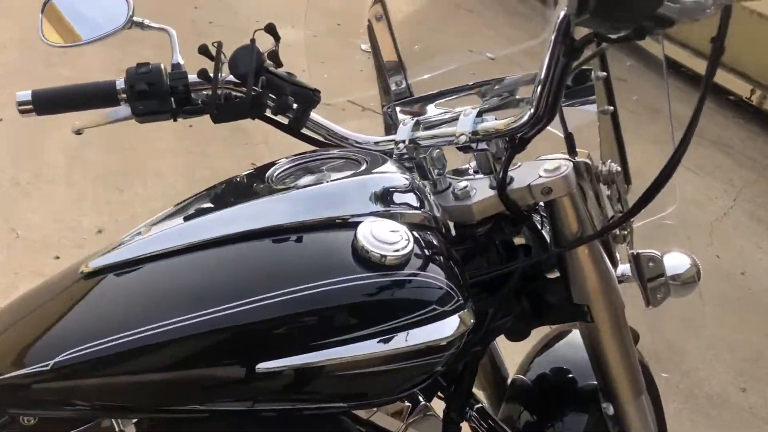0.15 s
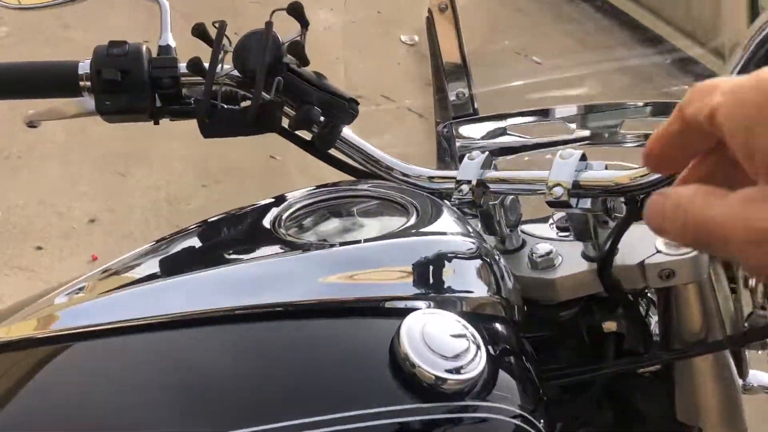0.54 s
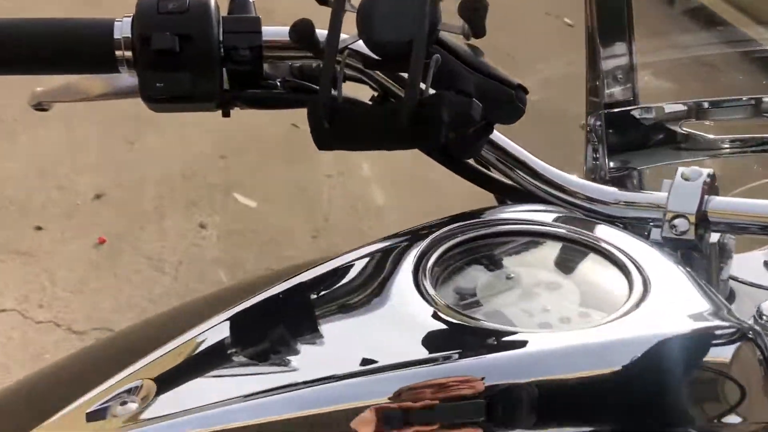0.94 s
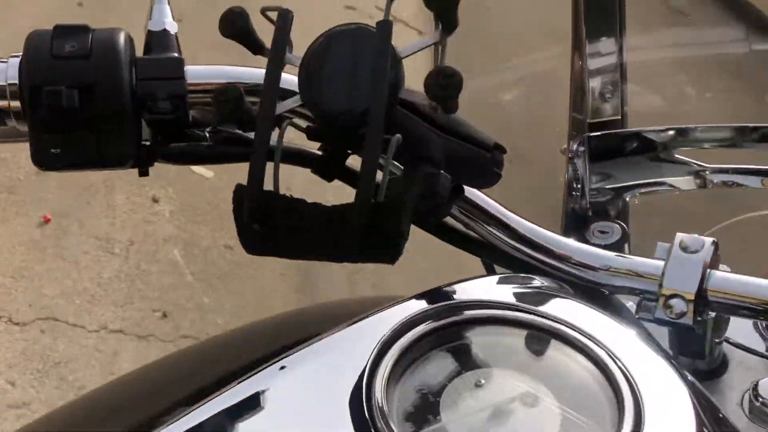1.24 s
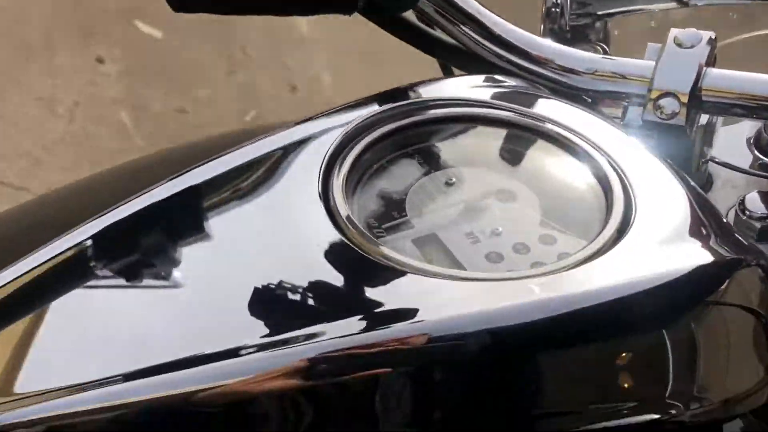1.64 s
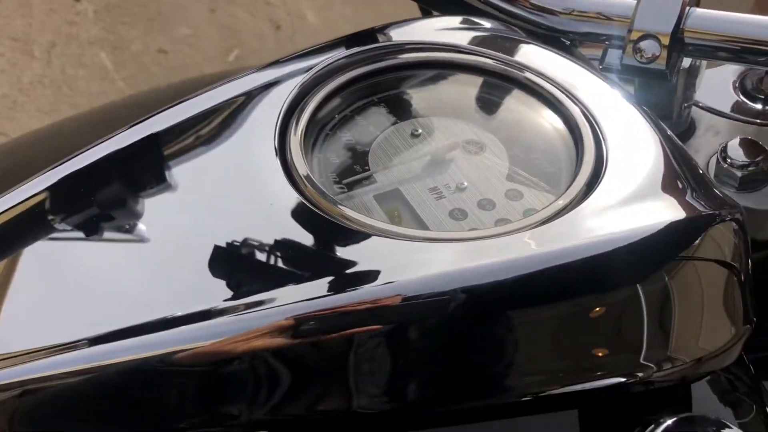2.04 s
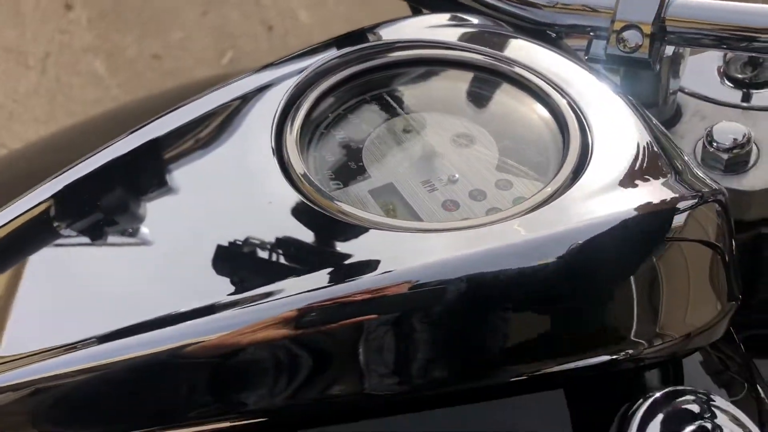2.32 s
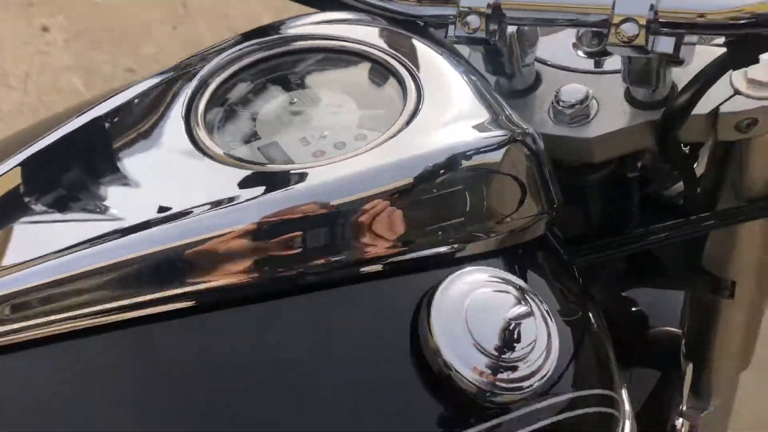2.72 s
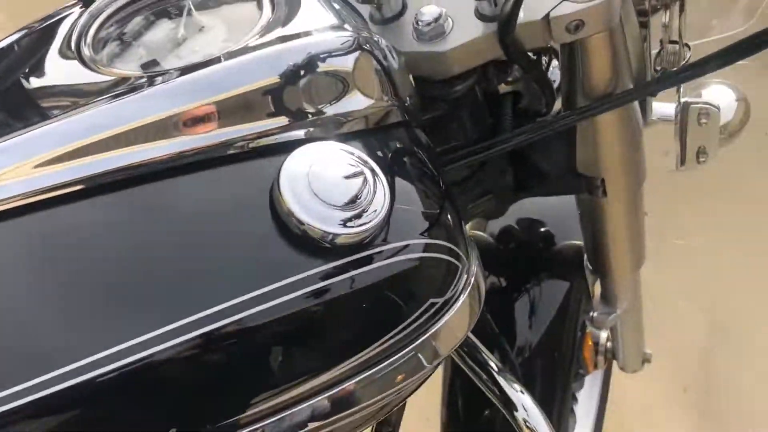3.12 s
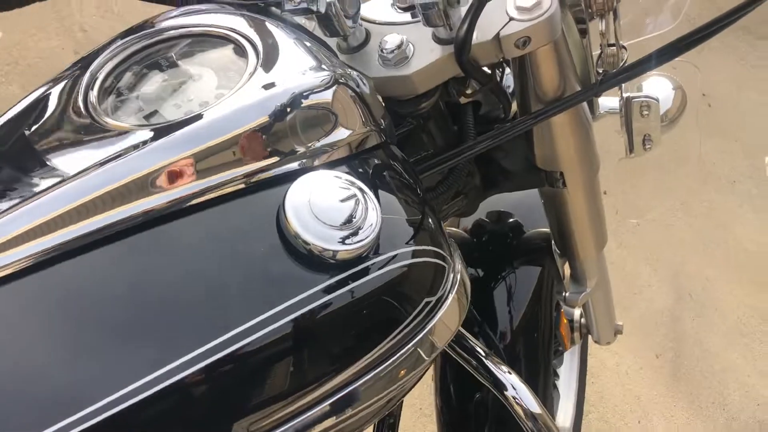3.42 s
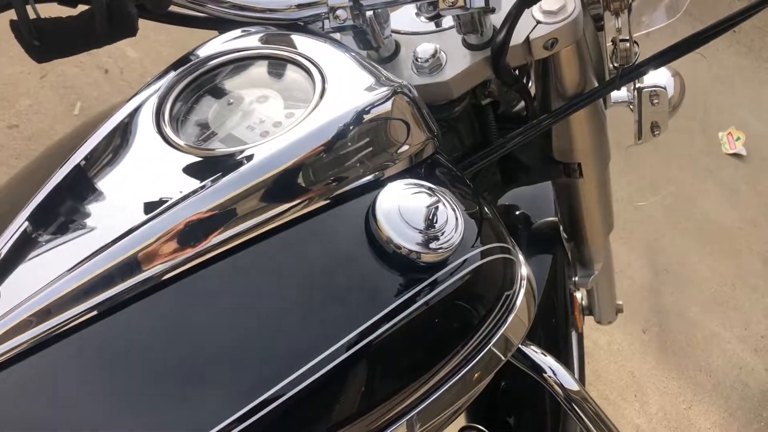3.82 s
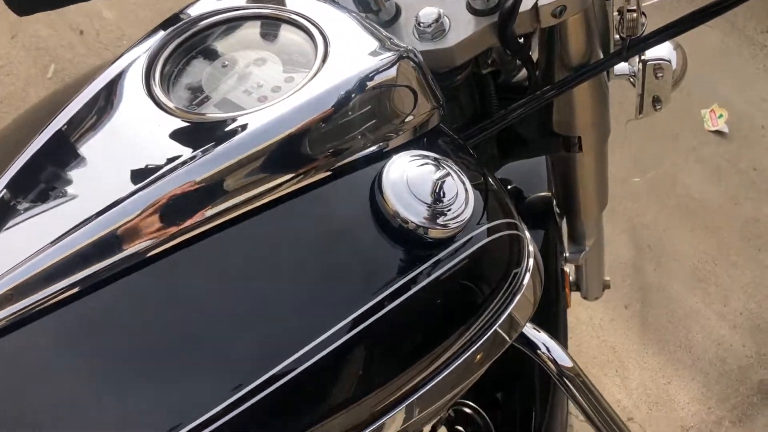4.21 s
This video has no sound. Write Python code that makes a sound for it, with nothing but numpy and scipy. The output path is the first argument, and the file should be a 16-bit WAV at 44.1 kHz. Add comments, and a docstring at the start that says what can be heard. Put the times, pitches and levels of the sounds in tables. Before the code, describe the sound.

Outdoors, close to a parked motorcycle, clothes rustle faintly and shoes scuff over a low rumble of distant traffic. A switch snaps with a sharp click. A relay ticks, and the electric fuel pump jolts and spins up into a steady high whine with a fine hiss. It keeps running to the end, with a few brief scuffs and knocks from the rider over it.

```python
"""Far traffic rumbles round a yard where a motorcycle stands. A rider shuffles close, cloth and shoes
making friction noise, and snaps the switch, whose contacts ring its modes. A relay ticks shut and the
fuel pump spins up, jolting as it first takes fuel. It runs on with a twelve-per-turn whine, weaker lines
at other multiples of the shaft speed, brush hiss that partly repeats every turn, and a housing that
resonates with the flow. Near the end the rider scuffs and knocks again."""
import sys
import numpy as np
from scipy import signal
from scipy.fft import rfft, irfft, next_fast_len
from scipy.io import wavfile
from scipy.ndimage import map_coordinates

SR = 44100
rng = np.random.default_rng(int(sys.argv[2]) if len(sys.argv) > 2 else 0)


def bounce(signal):
    """Save signal as a 16-bit WAV file at the path given by the first command-line argument."""
    frames = np.transpose(np.atleast_2d(signal))
    limited = np.clip(frames, -1, 1)
    pcm = np.round(limited * 32767).astype(np.int16)
    wavfile.write(sys.argv[1], SR, pcm)


N = 192364
TIME = np.arange(N) / SR
START_S = 1.8825   # the relay closes
RUNNING_S = np.clip(TIME - START_S, 0, None)


def pump():
    """Rotating machine: tones and brush hiss lock to one shaft angle; the other noises run free."""
    turns = shaft_turns()
    settled = np.clip((TIME - 1.96) / 0.06, 0, 1)   # fine lines form only once the speed steadies
    locked = whine(turns) + settled * shaft_lines(turns) + brushes(turns, settled)
    return locked + housing() + gulps() + sputter()


def shaft_turns():
    """Angle is the integral of speed: a quick kick, a slower creep, a sag as fuel pressure builds."""
    top_hz, sag_hz_per_s = 95.83, .47
    kick_hz, kick_s, creep_hz, creep_s = 59, .046, 11.7, .07
    missing_hz = kick_hz * np.exp(-(RUNNING_S / kick_s) ** 1.5) + creep_hz * np.exp(-RUNNING_S / creep_s)
    wobble_turns = 0.00095 * drift(8.2)
    return np.cumsum(top_hz - sag_hz_per_s * RUNNING_S - missing_hz) / SR + wobble_turns


def whine(turns, order=12):
    """Periodic forcing: a tone and its octave, which swell and dip as the listener moves round the tank."""
    # Level contour of the two tones: time_s, whine_db, octave_db
    contour = [(1.89, -58, -71), (1.94, -34, -58), (1.99, -38, -64), (2.05, -41.5, -61), (2.12, -43, -70),
               (2.18, -44, -63), (2.3, -45, -64), (2.61, -41, -72), (2.71, -43, -73), (2.8, -44.5, -62),
               (2.94, -47, -61.5), (3.09, -44.5, -60), (3.28, -46, -60.5), (3.46, -42, -55),
               (3.71, -46.5, -57.5), (4.25, -42, -58.5), (4.36, -42.5, -59)]
    whine_db, octave_db = in_time(contour, left=-120)
    phase = 2 * np.pi * order * turns
    tones = from_db(whine_db) * np.sin(phase) + from_db(octave_db) * np.sin(2 * phase)
    up_to_speed = np.clip((TIME - 1.93) / 0.12, 0, 1)
    return np.sqrt(2 * up_to_speed) * tones


def shaft_lines(turns):
    """Harmonics of the rotation: each flickers and is heard best at one moment of the listener's move."""
    # Shaft harmonics: cycles_per_turn, level_db, best_time_s
    lines = [(9, -60, 2.4), (11, -64, 2.8), (16, -65, 2.3), (18, -71, 2.3), (21, -72, 2.7), (36, -74, 2.4),
             (42, -73, 4.0), (43, -73, 2.2), (48, -69, 4.25), (54, -73, 3.3), (66, -72, 3.7),
             (72, -75, 2.6), (83, -62, 2.25), (87, -62, 2.7), (88, -65, 2.9), (90, -67, 4.0),
             (93, -67, 2.5), (95, -68, 4.1), (99, -66, 4.0), (107, -66, 3.8), (111, -64, 2.8),
             (115, -62, 2.95), (117, -62, 2.35), (119, -62, 3.1), (123, -63, 2.4), (131, -66, 2.6),
             (135, -65, 2.25), (147, -62, 2.6), (148, -64, 2.65), (149, -61, 2.5), (151, -61, 2.9),
             (152, -59, 3.2), (153, -59, 3.9), (155, -60, 2.3), (159, -59, 2.5), (160, -59, 2.5),
             (161, -61, 2.3), (163, -59, 2.5), (164, -58, 2.45)]
    # A bright band sliding over the highest lines: time_s, centre_hz
    bright_band = [(2.3, 15650), (2.65, 15550), (2.9, 14900), (3.1, 14300), (3.4, 14100), (4.36, 14800)]
    bright_db, bright_width_hz = 4.5, 140
    fall_db_per_s, depth_db, flicker_db = 11, 7.5, 2.5
    bright_hz = in_time(bright_band)[0]
    shaft_hz = np.gradient(turns) * SR
    out = np.zeros(N)
    for order, db, best_s in lines:
        lift_db = bright_db * np.exp(-((order * shaft_hz - bright_hz) / bright_width_hz) ** 2)
        away_db = np.minimum(fall_db_per_s * np.abs(TIME - best_s), depth_db)
        level = from_db(db - away_db + lift_db + flicker_db * drift(3.2))
        out += level * np.sin(2 * np.pi * order * turns + rng.uniform(0, 2 * np.pi))
    return np.sqrt(2) * out


def brushes(turns, settled):
    """Sliding friction: the brushes meet the same roughness every turn, wandering over several tracks."""
    # Spectrum of the hiss: frequency_hz, relative_density_db
    spectrum = [(1530, -52), (2600, -50), (3140, -36), (3830, -49), (4130, -8), (4290, -21), (4920, -18),
                (5230, -12.5), (6570, -18.5), (8200, -8), (9610, -9), (10900, -5.5), (13200, -6.5),
                (15100, 1), (16000, -4.5)]
    spots, repeat_share = 464, 0.69
    level_db, rise_s, surge_db, surge_s, fade_db_per_s = -47.5, 0.1, 4.5, 0.31, 1.5
    tracks = rng.standard_normal((6, spots))
    spot = (turns % 1) * spots
    weights = np.array([drift(2.5) for _ in tracks])
    weights /= np.linalg.norm(weights, axis=0)
    roughness = sum(weight * np.interp(spot, np.arange(spots), track, period=spots)
                    for weight, track in zip(weights, tracks))
    periodic = rms_one(signal.lfilter([1, -.5], [1], roughness))   # tilted towards the treble
    share = repeat_share * settled
    scrape = np.sqrt(share) * periodic + np.sqrt(1 - share) * rng.standard_normal(N)
    hiss_db = level_db + surge_db * np.exp(-RUNNING_S / surge_s) - fade_db_per_s * RUNNING_S
    onset = np.clip(RUNNING_S / rise_s, 0, 1) ** .5
    return onset * from_db(hiss_db) * coloured(ground_echo(scrape), spectrum)


def ground_echo(x, delay_s=.0007, wander_s=.00005, gain=.3):
    """Comb filtering: a ground reflection interferes with the hiss, shifting as the listener moves."""
    emitted_s = TIME - delay_s - wander_s * drift(0.45)
    return rms_one(x + gain * map_coordinates(x, [emitted_s * SR], order=3))


def housing(level_db=-50, fade_db_per_s=2, waver_db=1):
    """Forced resonance: the fuel flow shakes the housing, whose modes drone."""
    # Housing modes: frequency_hz, width_hz, relative_db
    modes = [(646, 8, 5.5), (787, 17, 1.5), (862, 21, 1), (1025, 86, 3.5), (1590, 68, -31),
             (2030, 200, -39)]
    flow = rng.standard_normal(N)
    drone = sum(from_db(db) * rms_one(resonance(flow, hz, width)) for hz, width, db in modes)
    drone_db = level_db - fade_db_per_s * RUNNING_S + waver_db * drift(9.0)
    return (RUNNING_S > 0) * from_db(drone_db) * rms_one(drone)


def gulps():
    """Damped transients: the pump jolts as it first takes fuel."""
    # Jolts: start_s, unfiltered_db, t60_s, centre_hz
    jolts = [(1.884, -31, 0.64, 1070), (1.901, -35.5, 0.57, 1630), (1.922, -18, 0.04, 816),
             (1.946, -15.5, 0.095, 830)]
    return sum(around(burst(s, db, rise_s=0.0052, t60_s=t60), hz, octaves=0.53) for s, db, t60, hz in jolts)


def sputter():
    """Narrow-band noise: a hiss swells briefly."""
    return around(burst(2.15, -42.5, rise_s=0.12, t60_s=0.26), hz=5700, octaves=.25)


def whistles(ramp_s=.003):
    """Gated pure tones: three thin, brief whistles just after the pump starts."""
    # Whistles: start_s, length_s, pitch_hz, level_db
    tones = [(2.17, .02, 13700, -50), (2.18, 0.048, 11750, -48), (2.243, 0.023, 8450, -47.5)]
    out = np.zeros(N)
    for s, length, hz, db in tones:
        gate = np.clip(np.minimum(TIME - s, s + length - TIME) / ramp_s, 0, 1)
        out += from_db(db) * gate * np.sin(2 * np.pi * hz * TIME)
    return out


def switch():
    """Impact excites modes: the contacts ring the switch, with a crack, a rattle and the yard's tail."""
    # Contact impacts: start_s, level_db
    snaps = [(1.7272, -29), (1.7291, -30.5), (1.7300, -21.5), (1.7315, -33), (1.736, -33), (1.742, -37)]
    # Switch modes: frequency_hz, gain_db, t60_s
    modes = [(860, -20, 0.14), (1044, -14, 0.079), (1480, -12, 0.016), (1980, -14, 0.035),
             (2375, 2.5, 0.011), (3940, -11.5, 0.023), (5160, -4.5, 0.029), (5920, -6.5, 0.019),
             (6790, -2, 0.02), (7370, -24, .025), (9090, -3.5, 0.014), (10600, -17, 0.017),
             (13700, -13, 0.017)]
    snap_s, snap_db = np.transpose(snaps)
    at = np.round(snap_s * SR).astype(int)
    signs = (-1) ** np.arange(1, len(at) + 1)
    ring = np.zeros(N)
    for hz, gain_db, t60 in modes:
        impulses = np.zeros(N)
        impulses[at] = signs * from_db(snap_db + gain_db + rng.normal(0, 0.6, len(at)))
        r, w = from_db(-60 / (t60 * SR)), 2 * np.pi * hz / SR   # pole radius and angle
        ring += signal.lfilter([0, np.sin(w)], [1, -2 * r * np.cos(w), r * r], impulses + 1e-18)
    ring = band(ring, low_hz=750, high_hz=19200)   # too small to thud
    rattle = around(burst(1.734, -43.5, rise_s=.004, t60_s=0.45), hz=5300, octaves=0.17)
    crack = band(burst(1.728, -17, rise_s=0.0022, t60_s=0.021), low_hz=3640, high_hz=17600)
    tail = band(burst(1.732, -37, rise_s=0.0021, t60_s=0.23), low_hz=885, high_hz=7300)
    return ring + rattle + crack + tail


def relay():
    """A short impact has a wide spectrum: the relay closes with one bright tick."""
    return band(burst(START_S, -39, rise_s=0.00088, t60_s=0.035), low_hz=2800, high_hz=16000)


def rider():
    """Friction and impact: scuffs, knocks and ticks are short noise bursts with a gritty amplitude."""
    # Shoe and hand scuffs: start_s, unfiltered_db, rise_s, t60_s, low_hz
    scuffs = [(0.03, -42.5, .027, 0.17, 2000), (0.476, -46, .004, 0.15, 1190), (.72, -62, .008, .06, 3000),
              (.805, -64, 0.014, 0.17, 5000), (1.063, -48, 0.0027, 0.051, 1500),
              (1.44, -55, 0.0086, 0.17, 2500), (3.475, -35.5, 0.0068, 0.082, 890),
              (3.641, -42, 0.0027, .04, 2500), (3.662, -46.5, 0.0055, 0.24, 1990),
              (3.772, -46, 0.014, 0.17, 1500)]
    # Dull knocks: start_s, unfiltered_db, t60_s, centre_hz
    knocks = [(.478, -38, 0.12, 1800), (3.482, -26, 0.065, 880), (3.506, -38, 0.07, 2200),
              (3.648, -29, 0.034, 1400), (3.865, -41, 0.021, 2190)]
    # Ticks of key and cables: start_s, unfiltered_db, t60_s, low_hz, high_hz
    ticks = [(.133, -45, .03, 5000, 16000), (1.2646, -40, 0.037, 1490, 16000),
             (1.297, -49, .014, 2500, 11000), (1.315, -68, .015, 7000, 12000),
             (1.361, -63, .015, 6000, 14000), (1.381, -56, .02, 5000, 16000),
             (1.412, -62, .015, 2500, 8000), (1.53, -59, .011, 10000, 14000),
             (2.126, -39.5, 0.05, 3300, 5600), (2.169, -44, .03, 3000, 8000),
             (3.652, -28.5, 0.019, 3500, 4640)]
    grit = from_db(2.03 * drift(280))
    out = sum(band(burst(s, db, rise, t60), low, high_hz=9900) for s, db, rise, t60, low in scuffs)
    for s, db, t60, hz in knocks:
        out += around(burst(s, db, rise_s=0.0033, t60_s=t60), hz, octaves=1.52)
    for s, db, t60, low, high in ticks:
        out += band(burst(s, db, rise_s=0.0016, t60_s=t60), low, high)
    return grit * out


def cloth():
    """Friction noise: the rider's clothes rustle in fine, uneven grains."""
    # Contour of the rustle: time_s, level_db
    contour = [(0.0, -63.5), (0.344, -70), (0.79, -68), (0.82, -58.5), (0.87, -58.5), (0.95, -55),
               (1.09, -57.5), (1.13, -60.5), (1.24, -58.5), (1.29, -68), (1.5, -72), (1.7, -72)]
    # Spectrum of the rustle: frequency_hz, relative_density_db
    spectrum = [(1180, -48), (2000, -2.5), (2880, -8.5), (3200, -2.5), (6640, -2.5), (8550, -5.5),
                (15100, -5.5), (16000, -7)]
    rustle_db = in_time(contour)[0] + 1.1 * drift(35)
    return from_db(rustle_db) * coloured(rng.standard_normal(N), spectrum)


def traffic(rumble_db=-45.5, hum_db=-54.5, hum_hz=138.2, width_hz=15.8, growth_db_per_s=0.28):
    """Broad and narrow-band noise: far traffic rumbles with a wavering hum, slowly growing."""
    # Spectrum of the rumble: frequency_hz, relative_density_db
    spectrum = [(21, -41), (35, -9), (60, -1.5), (156, 0), (477, -12), (715, -9), (1420, -23),
                (1650, -25.5), (2480, -34), (5300, -39), (6020, -63), (10300, -61), (15000, -66)]
    hum = resonance(rng.standard_normal(N), hum_hz, width_hz)
    hum = from_db(hum_db) * rms_one(resonance(hum, hum_hz, width_hz))
    rumble = from_db(rumble_db) * coloured(rng.standard_normal(N), spectrum)
    return from_db(growth_db_per_s * (TIME - 2.5)) * (rumble + hum)


def burst(start_s, level_db, rise_s, t60_s):
    """Exponential decay: white noise swells for rise_s, then loses 60 dB every t60_s."""
    t = TIME - start_s
    decay_db = 60 * np.clip(t - rise_s, 0, None) / t60_s
    return np.clip(t / rise_s, 0, 1) * from_db(level_db - decay_db) * rng.standard_normal(N)


def drift(rate_hz):
    """Random modulation: noise through two one-pole low-passes; rms 1."""
    hop, run_in = 40, 2000
    r = np.exp(-2 * np.pi * rate_hz * hop / SR)
    slow = signal.lfilter([1], [1, -2 * r, r * r], rng.standard_normal(N // hop + run_in + 2))[run_in:]
    return np.interp(np.arange(N) / hop, np.arange(len(slow)), rms_one(slow))


def coloured(x, spectrum):
    """Spectral shaping by (frequency_hz, gain_db) points; rms 1."""
    size = next_fast_len(N)
    hz, db = np.transpose(spectrum)
    bin_hz = np.arange(size // 2 + 1) * SR / size
    gain = from_db(np.interp(np.log(bin_hz + 1), np.log(hz), db))
    return rms_one(irfft(rfft(x, size) * gain, size)[:N])


def resonance(x, hz, width_hz):
    """A damped oscillator driven by x."""
    r = np.exp(-np.pi * width_hz / SR)
    feedback = [1, -2 * r * np.cos(2 * np.pi * hz / SR), r * r]
    return signal.lfilter(np.array([1, 0, -1]) * (1 - r * r) / 2, feedback, x)


def band(x, low_hz, high_hz):
    """Band-pass between two edges."""
    sos = signal.butter(2, [low_hz, min(high_hz, .45 * SR)], "band", fs=SR, output="sos")
    return signal.sosfilt(sos, x + 1e-18)


def around(x, hz, octaves):
    """Band-pass about a centre."""
    return band(x, hz * 2 ** (-octaves / 2), hz * 2 ** (octaves / 2))


def in_time(rows, **outside):
    """Linear interpolation of (time_s, values...) rows, one curve per value column."""
    times, *columns = np.transpose(rows)
    return [np.interp(TIME, times, column, **outside) for column in columns]


def from_db(db):
    return 10 ** (np.asarray(db) / 20)


def rms_one(x):
    return x / np.sqrt(np.mean(x ** 2) + 1e-20)


def scene():
    """Superposition: all sources add in one channel."""
    return (pump() + whistles() + switch() + relay() + rider() + cloth() + traffic())[None]


def record(dry):
    """Band limiting: the microphone drops the deepest bass, and the top is cut steeply."""
    low_hz, high_hz = 40, 15720
    dry = signal.sosfilt(signal.butter(5, low_hz, "high", fs=SR, output="sos"), dry)
    return signal.sosfilt(signal.ellip(10, .3, 55, high_hz, fs=SR, output="sos"), dry)


dry = scene()
out = record(dry)
bounce(out)
```